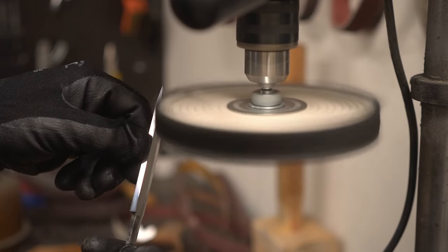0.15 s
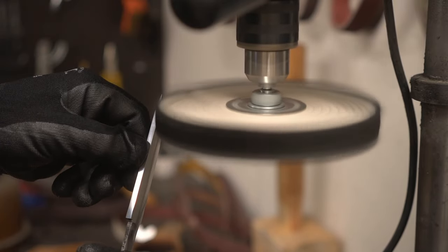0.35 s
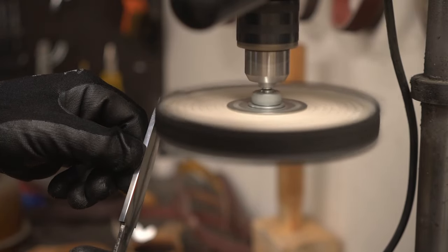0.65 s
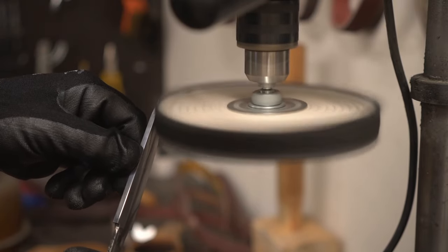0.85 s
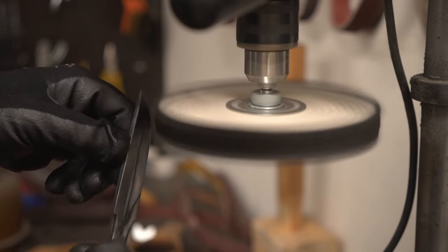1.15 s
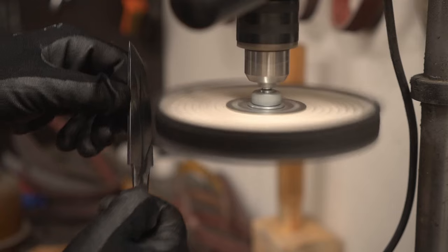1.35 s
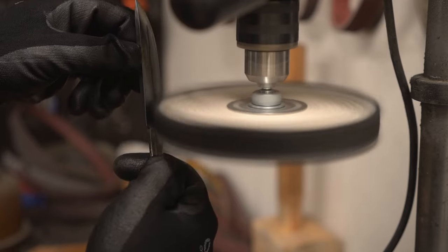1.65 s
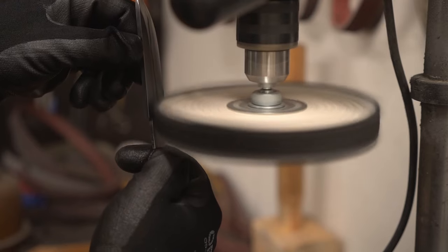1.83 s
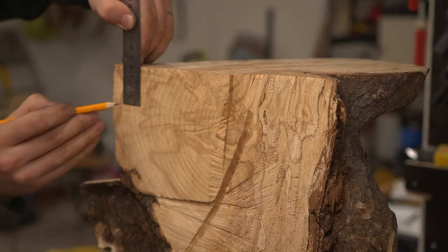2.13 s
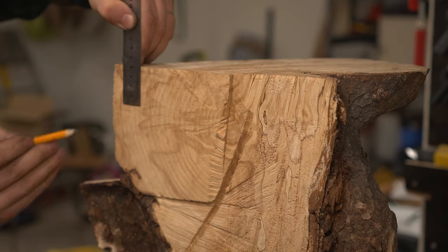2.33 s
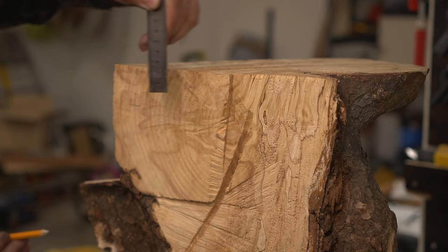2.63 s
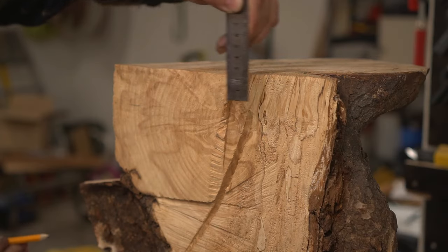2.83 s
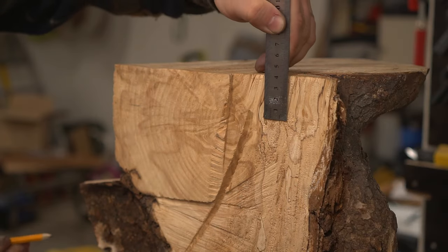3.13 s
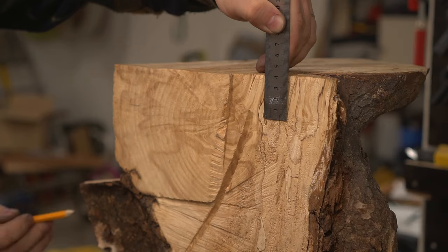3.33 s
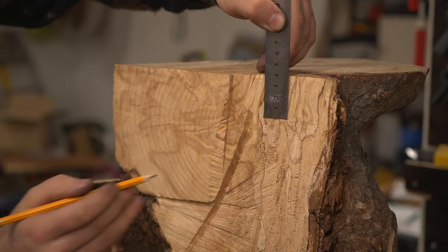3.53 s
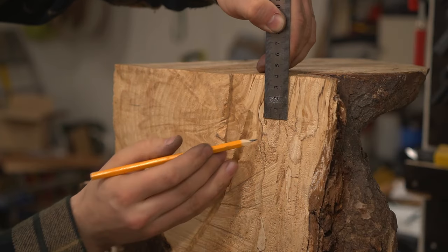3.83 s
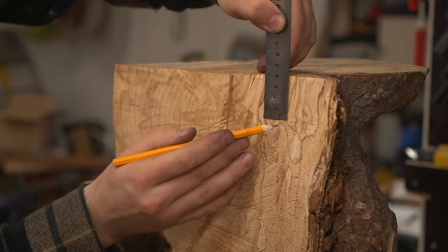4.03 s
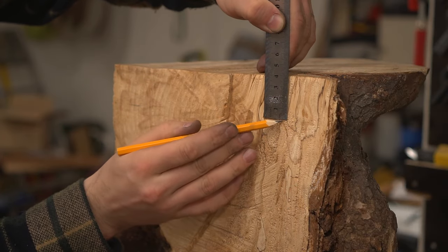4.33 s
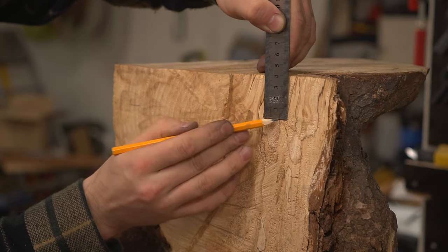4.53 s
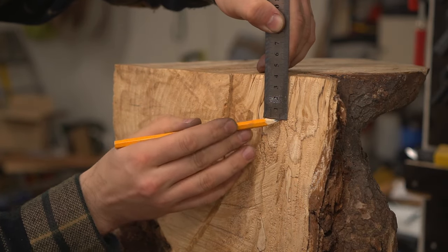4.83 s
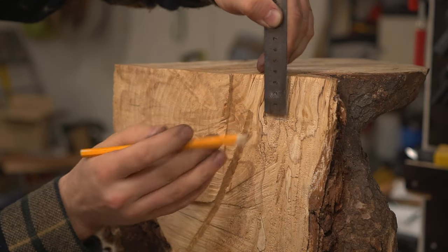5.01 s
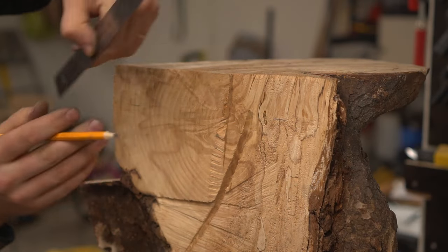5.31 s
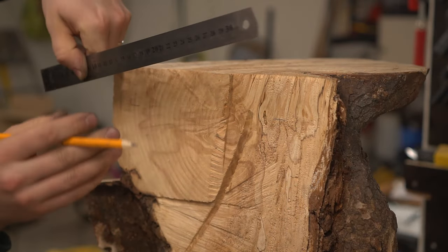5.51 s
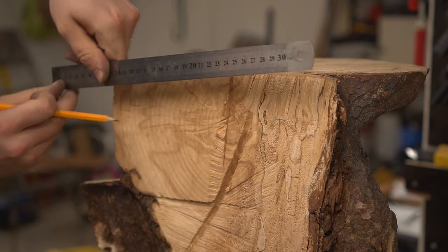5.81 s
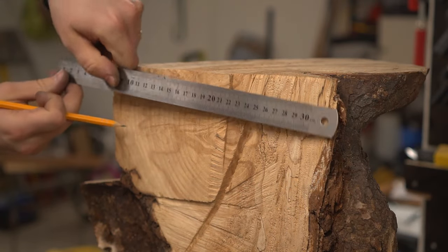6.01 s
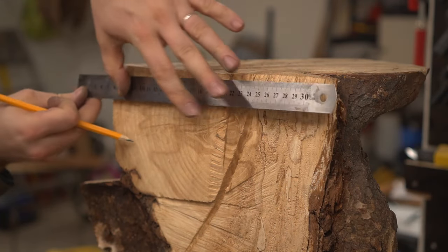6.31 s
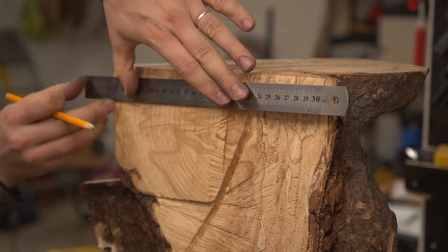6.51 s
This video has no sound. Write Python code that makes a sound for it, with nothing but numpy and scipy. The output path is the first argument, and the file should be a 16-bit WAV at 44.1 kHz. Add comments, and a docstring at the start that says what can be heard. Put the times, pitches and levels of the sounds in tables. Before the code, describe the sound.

Loud motor hum, hissing buffing wheel and metallic chatter die away, leaving faint pencil taps, short scratches and a steel ruler clinking on a wooden block.

```python
"""A drill press spins a cloth buffing wheel against a blade: steady hum tones, filtered-noise rumble and rubbing,
and a spindle rattling in its play; over this come hard clacks, and the machine fades away.
In the quiet workshop a steel ruler touches a block of wood, then a pencil taps and makes short scratching strokes.
The ruler brushes through the fingers, is laid across the block and slid along: struck modes and friction noise.
A hand leaning on the block booms its stand; soft air noise lies beneath everything and slowly grows louder."""
import sys
import numpy as np
from scipy import signal
from scipy.fft import rfft, irfft
from scipy.io import wavfile
from scipy.ndimage import uniform_filter1d

SR = 44100
rng = np.random.default_rng(int(sys.argv[2]) if len(sys.argv) > 2 else 0)


def unload_wav(signal):
    """Save mono or channel-first audio to the path in sys.argv[1] as 16-bit WAV at rate SR, clipped to [-1, 1]."""
    wavfile.write(
        sys.argv[1],
        SR,
        np.round(np.clip(np.atleast_2d(signal).T, -1, 1) * 32767).astype(np.int16),
    )


N = 293706
T = np.arange(N) / SR  # time of each sample [s]


def undb(db):
    """Logarithmic level: decibels to amplitude gain."""
    return 10 ** (np.asarray(db) / 20)


def unit(x):
    """Normalisation: scale to an rms of 1."""
    return x / np.sqrt(np.mean(x ** 2))


def curves(table):
    """Linear interpolation: the columns of a timed table at every sample."""
    s, *columns = np.transpose(table)
    return [np.interp(T, s, column) for column in columns]


def on_log_axis(hz, points):
    """Logarithmic pitch axis: read (frequency [Hz], value) points at the given frequencies."""
    f, value = np.transpose(points)
    return np.interp(np.log(hz), np.log(f), value)


def convolve(x, response):
    """Linear superposition: pass a sound through an impulse response."""
    return signal.oaconvolve(x, response)[:len(x)]


def colour(points, size=4096):
    """Minimum phase: a causal impulse response with the given spectrum, by folding its cepstrum."""
    hz = np.maximum(np.arange(size // 2 + 1) * SR / size, 1)
    cepstrum = irfft(np.log(undb(on_log_axis(hz, points))))
    cepstrum[1:size // 2] *= 2
    cepstrum[size // 2 + 1:] = 0
    return irfft(np.exp(rfft(cepstrum)))


def ring(modes, size=16384):
    """Modal superposition: exponentially damped sines, neighbours in opposite directions."""
    t = T[:size]
    out = np.zeros(size)
    for k, (hz, width, db) in enumerate(modes):
        # a wider resonance dies sooner
        decay = np.exp(-np.pi * width * t)
        out += (-1) ** k * undb(db) * width * decay * np.sin(2 * np.pi * hz * t)
    return out


def noise():
    """Random excitation: white Gaussian noise."""
    return rng.standard_normal(N)


def walk(rate):
    """Slow fluctuation: smoothed random steps at the given rate [Hz], with rms 1."""
    k = int(SR / rate)
    steps = noise()[np.arange(N) // k]
    return unit(uniform_filter1d(uniform_filter1d(steps, k), k))


def grains(spread_db, size=24):
    """Dry friction: tiny slips of very uneven strength."""
    strength_db = spread_db * noise()[np.arange(N) // size]
    return unit(noise() * undb(strength_db))


def add(track, s, sound):
    """Superposition: mix a short sound into a track at time s."""
    i = int(s * SR)
    track[i:i + len(sound)] += sound[:N - i]


def strike(response, db, contact_s, grit=.3):
    """Impact excitation: a blow with a brief gritty contact rings a body; db is its peak."""
    n = len(response)
    push = grit * rng.standard_normal(n) * np.exp(-T[:n] / contact_s)
    push[0] = 1
    sound = convolve(push, response)
    return undb(db) * sound / np.abs(sound).max()


def stroke_speed(strokes):
    """Sliding friction grows with speed: the level rises to the fastest point and falls to a stop."""
    return sum(undb(db) * np.interp(T, [start, fastest, end], [0, 1, 0])
               for start, fastest, end, db in strokes)


# rumble of wheel and belt, cloth on steel, chatter of the spindle: (frequency [Hz], relative density [dB per Hz])
RUMBLE_COLOUR = [(20, -14), (60, -10.5), (95, -4), (160, -3.5), (255, 3), (350, -0.5), (430, -7),
                 (520, -8.5), (600, -14.5), (800, -10), (1050, -18), (2000, -51)]
RUB_COLOUR = [(400, -6), (1000, -3.5), (1700, -2.5), (2050, 1), (2500, -8), (3000, -0.5), (3900, -8),
              (4500, -11), (5100, -15), (8000, -18.5), (12000, -32), (15000, -43)]
CHATTER_COLOUR = [(500, -3), (1500, -0.5), (3200, 0), (4400, 2.5), (5000, -7), (5700, 2), (6300, -8.5),
                  (6700, 3.5), (7500, 1.5), (8800, -5), (10000, -10.5), (12200, -23), (13500, -33),
                  (16000, -30)]
# ringing of quill, chuck and belt cover: (frequency [Hz], width [Hz], relative level [dB])
CASTING_MODES = [(544.7, 17, 13), (822, 56, 4.5), (944, 38, 4), (1252, 39, 10), (1504, 60, 2.5),
                 (2046, 59, 5.5), (2160, 17, -9), (2394, 19, 3.5), (2730, 32, 5), (3526, 47, 0.5),
                 (4123, 35, -1.5), (4327, 41, 1.5), (5390, 19, -3.5), (8200, 180, -11.5), (8400, 56, -15),
                 (10320, 110, -27), (11800, 98, -22), (15000, 110, -48)]
# a clack of steel on steel: (frequency [Hz], relative density [dB per Hz])
CLACK_SPECTRUM = [(400, 4), (1400, 1), (4300, 4), (5100, -3), (6300, -14), (6800, 2.5), (8300, 0),
                  (9700, -9.5), (12000, -14.5), (13500, -26), (15500, -21)]
# hard clacks of the spindle: (time [s], peak before CLACK_GAIN_DB [dB])
SPINDLE_CLACKS = [(0.0815, -34), (0.1625, -24), (0.2437, -22), (0.3734, -22.5), (0.6549, -22.5),
                  (0.6835, -24), (0.832, -24.5), (1.065, -24.5), (1.095, -23.5), (1.1945, -19.5),
                  (1.2441, -25.5), (1.6344, -34), (1.6834, -20)]
CLACK_GAIN_DB = 2.5
# the hand holds the blade to the wheel: (time [s], pressure [dB], looseness of the grip [0-1])
BLADE_GRIP = [(0, -1.35, 0), (.3, 0.1, 0), (.58, -1.46, 0.3), (.78, -1.54, 0), (1.1, -0.2, 0.3),
              (1.22, .5, 0.55), (1.35, -1, 1), (1.55, 0, 0.85), (1.69, 0.6, 0.6), (1.87, -1.5, 0.33),
              (2.03, 0.6, 0), (2.35, -1, 0)]
# the wheel drags and its rumble swells: (time [s], swell [dB])
RUMBLE_SURGES = [(.32, 3), (.5, 2), (.73, 4.5), (.875, 3), (1.41, 5)]
SURGE_S = 0.015  # standard deviation of each swell
MAINS_PULSE_HZ, SPINDLE_HZ = 100, 38.95
# the machine runs at a steady level, then fades to nothing
RUN_DB, FADE_FROM_S, FADE_TO_S, FADE_POWER = -29, 1.38, 2.417, 0.87
# level before the pressure acts, and dB lost at the slack of the lap with a fully loose grip
RUB_DB, RUB_SLACK_DB = -4, 6.5
CASTING_DB, CASTING_SLACK_DB = -5, 7
RATTLE_DB, RATTLE_SLACK_DB = -11.5, 15
# a loose grip lets the spindle rattle [dB]; rattle per pressure [dB per dB]
RATTLE_LOOSE_DB, RATTLE_PER_PRESSURE = 4.5, 1.8


def drill_press():
    """Forced vibration: blade pressure and belt lap drive rubbing and rattle over hum and rumble."""
    pressure_db, loose = curves(BLADE_GRIP)
    slack = loose * belt_slack()

    surge_db = sum(db * np.exp(-.5 * ((T - s) / SURGE_S) ** 2) for s, db in RUMBLE_SURGES)
    rumble_db = -1.5 + surge_db + 0.34 * walk(25.48)
    rumble = unit(convolve(noise(), colour(RUMBLE_COLOUR))) * undb(rumble_db)

    # the cloth rubs unevenly round each turn
    tufts = noise() * undb(0.5 * np.cos(2 * np.pi * SPINDLE_HZ * T) + 2.8 * walk(120))
    rub_db = RUB_DB + pressure_db - RUB_SLACK_DB * slack
    rub = unit(convolve(tufts, colour(RUB_COLOUR))) * undb(rub_db)

    rattle_db = RATTLE_DB + RATTLE_PER_PRESSURE * pressure_db + RATTLE_LOOSE_DB * loose
    rattle_db = rattle_db - RATTLE_SLACK_DB * slack
    rattle = spindle_play(scatter_db=3.0, turn_db=6.0, between=0.11)
    chatter = unit(convolve(rattle, colour(CHATTER_COLOUR))) * undb(rattle_db)

    casting_db = CASTING_DB + pressure_db - CASTING_SLACK_DB * slack
    shaking = spindle_play(scatter_db=1.3, turn_db=2.1, between=0.27)
    casting = unit(convolve(shaking, ring(CASTING_MODES))) * undb(casting_db)

    fade = np.clip((FADE_TO_S - T) / (FADE_TO_S - FADE_FROM_S), 0, 1) ** FADE_POWER
    out = (motor() + rumble + reflections(rub + chatter) + casting) * undb(RUN_DB) * fade
    for s, db in SPINDLE_CLACKS:
        clack = strike(colour(CLACK_SPECTRUM), db + CLACK_GAIN_DB, contact_s=0.0061, grit=0.75)
        add(out, s, clack)
    return out


# shaft, belt and mains tones: (frequency [Hz], relative rms level [dB])
HUM_TONES = [(24.7, -30), (32, -26), (39, -27), (48.7, -45), (57.5, -42), (100, -11), (129.5, -18.5),
             (138.9, -33), (200, -17.5), (271.5, -14.5), (545, -20), (741, -19), (821, -20)]


def motor(waver_db=-0.2, waver_rad=0.57):
    """Periodic forces give steady partials, each wavering in level and phase with the load."""
    out = np.zeros(N)
    for hz, db in HUM_TONES:
        level = undb(db + waver_db * walk(12.0)) * np.sqrt(2)
        phase = waver_rad * walk(6.77) + rng.uniform(0, 2 * np.pi)
        out += level * np.sin(2 * np.pi * hz * T + phase)
    return out


def spindle_play(scatter_db, turn_db, between, contact_s=0.0021):
    """Repeated impacts: each torque pulse knocks the spindle in its play, harder once a turn."""
    phase = MAINS_PULSE_HZ * T + .07 * walk(90) + 1  # counts pulses, with jitter
    turn = np.cos(2 * np.pi * SPINDLE_HZ * T + np.pi)
    force_db = scatter_db * noise()[phase.astype(int)] + turn_db * turn
    knock = np.exp(-(phase % 1) / MAINS_PULSE_HZ / contact_s)
    return unit(noise() * undb(force_db) * (knock + between))


# the belt runs one lap in LAP_S; at SLACK_S it is slackest and the wheel falls away from the blade
LAP_S, SLACK_S = 0.1195, 1.347


def belt_slack(sharpness=1.83):
    """Periodic tension: once a lap the belt goes from 0 when taut to 1 when slackest."""
    lap = .5 + .5 * np.cos(2 * np.pi * (T - SLACK_S) / LAP_S)
    return lap ** sharpness


def reflections(x, count=10):
    """Comb filtering: weak early echoes from table, column and wall interfere with the direct hiss."""
    response = np.zeros(1024)
    response[rng.integers(90, 1000, count)] = .1 * rng.choice([-1, 1], count)
    response[0] = 1
    return convolve(x, response / np.sqrt(np.sum(response ** 2)))


# modes of the steel ruler, of its edge clicking on wood, of the block: (frequency [Hz], width [Hz], relative level [dB])
RULER_MODES = [(497, 90, -2), (835, 50, -1), (1220, 16, 6.5), (1406, 55, 9), (1600, 290, -1),
               (2390, 120, -3), (2740, 55, -6), (3300, 240, -11), (3600, 170, -20), (4080, 250, -21),
               (5670, 290, -27)]
EDGE_MODES = [(520, 160, -9), (940, 70, 5), (1490, 310, -4), (1970, 190, 0.5), (2780, 140, -4),
              (3360, 130, 5), (3760, 18, 10), (4430, 500, -6), (6800, 1500, -8.5), (9300, 1200, -4)]
BLOCK_MODES = [(144, 13, -1.5), (200, 13, -7), (297, 14, -2), (383, 39, -11.5), (486, 23, -11.5),
               (635, 75, -5.5), (910, 320, -14)]  # the pencil knocks the same block
# ruler touches the block:
# (time [s], edge click peak [dB], steel ring peak [dB], wood knock peak [dB], contact [s])
RULER_TOUCHES = [(3.0276, -35, -55, -54, 0.00076), (3.0318, -48, -53, -69, .001),
                 (6.0637, -40, -29.5, -48, 0.00083), (6.333, -71, -55, -46, 0.0026),
                 (6.3797, -45.5, -39, -47, 0.0015), (6.388, -64, -62, -44.5, 0.0042),
                 (6.623, -54, -72, -56, .001)]
# ruler slides: (start [s], fastest [s], end [s], level at the fastest [dB])
RULER_SLIDES = [(6.155, 6.232, 6.31, -55), (6.33, 6.42, 6.65, -60.5)]
# steel sliding on sawn wood: (frequency [Hz], relative density [dB per Hz])
SLIDE_SPECTRUM = [(60, 2), (150, -1), (500, 5.5), (900, -5.5), (2000, -5), (3500, -8), (4800, -19),
                  (7000, -16), (10200, -19), (12500, -30)]


def ruler():
    """Coupled impact and friction: edge clicks, strip rings, block knocks; the steel slides on the grain."""
    sliding = unit(convolve(grains(spread_db=6.0), colour(SLIDE_SPECTRUM)))
    out = sliding * stroke_speed(RULER_SLIDES) * undb(walk(50))
    edge, steel, wood = ring(EDGE_MODES), ring(RULER_MODES), ring(BLOCK_MODES)
    for s, edge_db, steel_db, wood_db, contact_s in RULER_TOUCHES:
        add(out, s, strike(edge, edge_db, contact_s, grit=0.071))
        add(out, s, strike(steel, steel_db, contact_s, grit=0.16))
        add(out, s, strike(wood, wood_db, contact_s, grit=0.17))
    return out


# modes of the pencil, and graphite hissing on the grain: (frequency [Hz], width [Hz], relative level [dB])
PENCIL_MODES = [(357, 260, -0.5), (690, 430, 0), (1260, 220, -1.5), (2010, 430, 2), (2950, 790, -2),
                (3880, 1100, -3.5), (4230, 160, -3.5), (6560, 1600, -15), (9600, 1000, -14),
                (10100, 450, -10)]
GRAPHITE_MODES = [(3760, 300, 0), (6800, 460, -8), (10500, 680, -4)]
GRAPHITE_DB = -9.5  # hiss against the scratch
# pencil tip lands or snags: (time [s], tip peak [dB], wood knock peak [dB])
PENCIL_TOUCHES = [(4.157, -48, -63), (4.2646, -48.5, -62), (4.383, -52.5, -71), (4.557, -47, -52),
                  (4.585, -37.5, -52.5), (4.678, -48, -68), (4.73, -37, -53), (4.741, -45, -52),
                  (4.9284, -42.5, -49.5), (4.9598, -41, -54)]
# pencil strokes: (start [s], fastest [s], end [s], scratch level at the fastest [dB])
PENCIL_STROKES = [(4.54, 4.592, 4.606, -54), (4.718, 4.729, 4.748, -52.5), (4.905, 4.93, 4.98, -57.5),
                  (5.0, 5.032, 5.08, -68)]


def pencil(slip_db=8.5):
    """Friction-driven resonance: graphite scratches and hisses; landings and snags ring tip and block."""
    tip, wood = ring(PENCIL_MODES), ring(BLOCK_MODES)
    scratch = unit(convolve(grains(spread_db=slip_db), tip))
    hiss = unit(convolve(grains(spread_db=slip_db), ring(GRAPHITE_MODES))) * undb(GRAPHITE_DB)
    out = (scratch + hiss) * stroke_speed(PENCIL_STROKES)
    for s, tip_db, wood_db in PENCIL_TOUCHES:
        add(out, s, strike(tip, tip_db, contact_s=0.0013, grit=0.55))
        add(out, s, strike(wood, wood_db, contact_s=0.0047, grit=0.075))
    return out


# ruler is swung round through the fingers: (start [s], fastest [s], end [s], level at the fastest [dB])
RULER_SWINGS = [(5.12, 5.45, 5.85, -67.5)]
# steel brushing on skin: (frequency [Hz], relative density [dB per Hz])
SWING_SPECTRUM = [(200, -2), (1200, -2), (2300, -0.5), (3600, -3.5), (4400, -16), (9000, -14.5),
                  (13000, -31)]


def ruler_swing():
    """Soft friction: the steel strip brushes through the fingers as it is turned flat."""
    brushing = unit(convolve(grains(spread_db=1.5), colour(SWING_SPECTRUM)))
    return brushing * stroke_speed(RULER_SWINGS)


# modes of the stand under the block: (frequency [Hz], width [Hz], relative level [dB])
STAND_MODES = [(78.5, 9.9, -2), (149.3, 5.2, -0.5), (199, 14, -9.5)]
# a hand leans on the block and rocks its stand: (time [s], peak [dB])
HAND_LEANS = [(4.59, -66), (4.678, -53.5), (4.958, -57), (6.08, -52), (6.342, -56), (6.404, -41),
              (6.579, -54)]


def stand(press_s=0.0081):
    """Soft impact on a heavy resonator: the weight of a hand booms the block briefly on its stand."""
    out = np.zeros(N)
    response = ring(STAND_MODES)
    onset = 1 - np.exp(-T[:len(response)] / press_s)
    for s, db in HAND_LEANS:
        add(out, s, strike(response * onset, db, contact_s=.001, grit=.02))
    return out


# decay of the workshop: (frequency [Hz], time to fall 60 dB [s])
WORKSHOP_T60 = [(120, 0.97), (400, 0.55), (1200, 0.32), (3200, 0.29), (7000, 0.26), (14000, 0.079)]


def workshop(x, wet_db=-4, build_s=0.00047, size=32768):
    """Reverberation: direct sound plus a short diffuse tail whose treble dies first."""
    t, hz = T[:size], np.arange(size // 2 + 1) * SR / size
    spectrum = rfft(rng.standard_normal(size))
    centres, t60s = np.transpose(WORKSHOP_T60)
    tail = np.zeros(size)
    # overlapping triangular bands, each with its own decay
    for share, t60 in zip(np.eye(len(centres)), t60s):
        band = irfft(spectrum * np.interp(hz, centres, share))
        tail += band * undb(-60 * t / t60)
    tail = tail * (1 - np.exp(-t / build_s))
    return x + undb(wet_db) * convolve(x, tail / np.sqrt(np.sum(tail ** 2)))


# air of the quiet workshop: (frequency [Hz], relative density [dB per Hz])
AIR_SPECTRUM = [(12, -33), (20, -2.5), (148, -7.5), (207, -9.5), (238, -6), (274, -10.5), (342, -10.5),
                (404, -10.5), (597, -12.5), (906, -13.5), (1160, -14), (1580, -18.5), (2680, -19),
                (2920, -21), (15500, -31)]
AIR_DB, AIR_RISE_DB_PER_S = -67, .6  # mean level; the air grows slowly louder


def room_tone():
    """Broadband background noise: soft air and hiss, drifting slightly as it rises."""
    level_db = AIR_DB + AIR_RISE_DB_PER_S * (T - T.mean()) + 0.22 * walk(3.4)
    return unit(convolve(noise(), colour(AIR_SPECTRUM))) * undb(level_db)


def scene():
    """Superposition of sources: the machine, then the marking out at the block, over the room's air."""
    handwork = workshop(ruler() + ruler_swing() + pencil(), wet_db=-5.0)
    return (drill_press() + handwork + stand() + room_tone())[None]


TOP_HZ = 15550


def record(dry):
    """Band limiting: a steep elliptic low-pass removes the top treble."""
    low_pass = signal.ellip(10, .2, 70, TOP_HZ, fs=SR, output="sos")
    return signal.sosfilt(low_pass, dry)


dry = scene()
out = record(dry)
unload_wav(out)
```